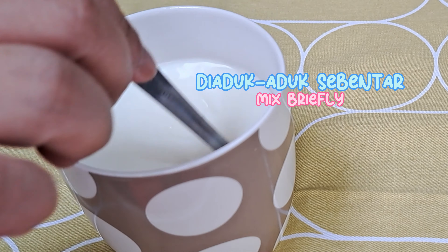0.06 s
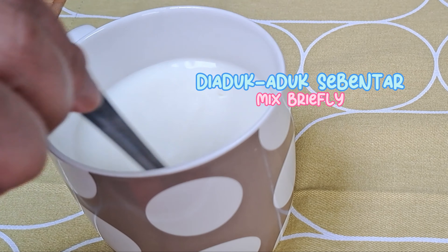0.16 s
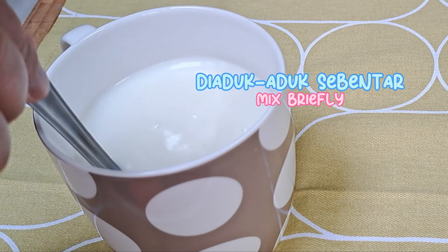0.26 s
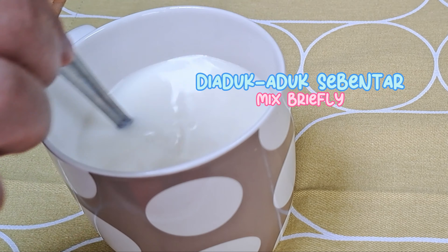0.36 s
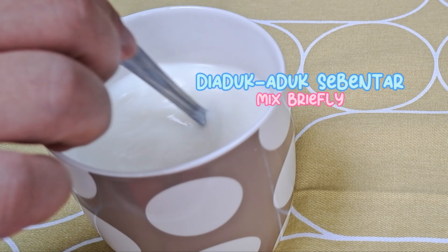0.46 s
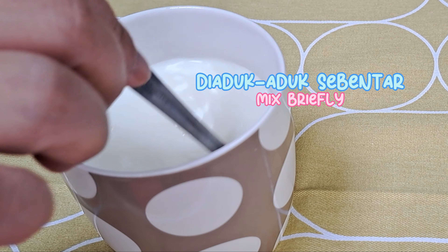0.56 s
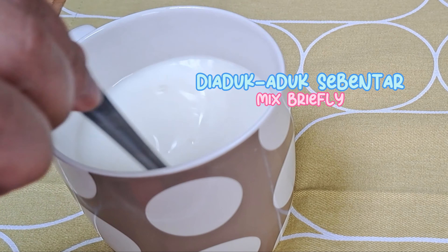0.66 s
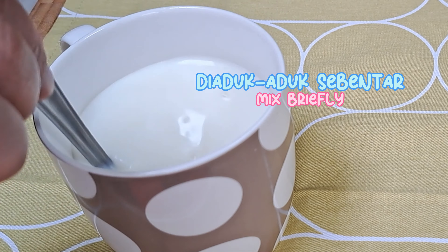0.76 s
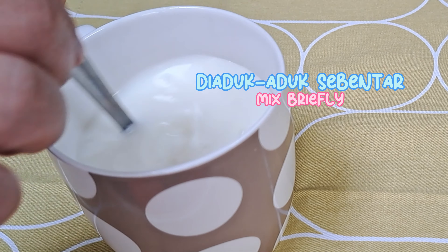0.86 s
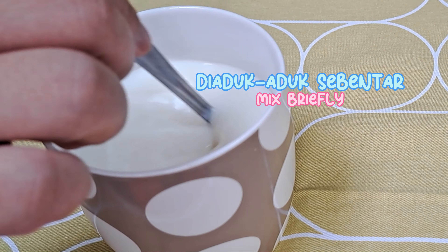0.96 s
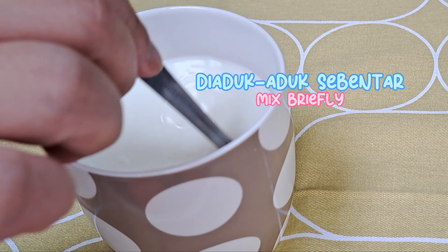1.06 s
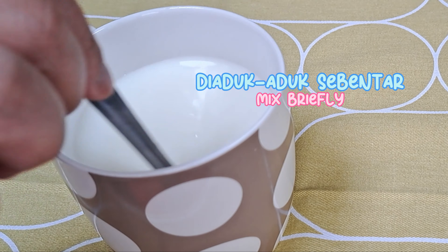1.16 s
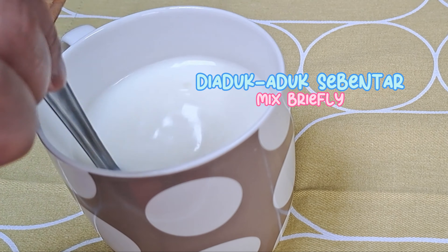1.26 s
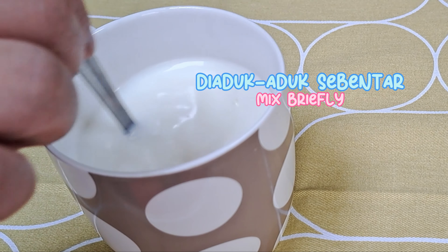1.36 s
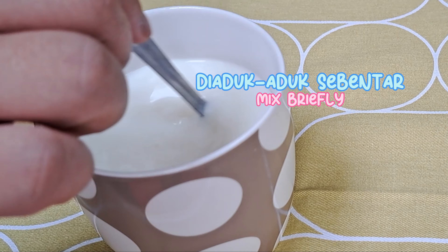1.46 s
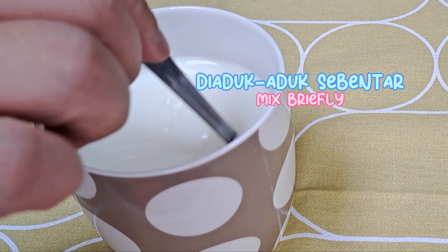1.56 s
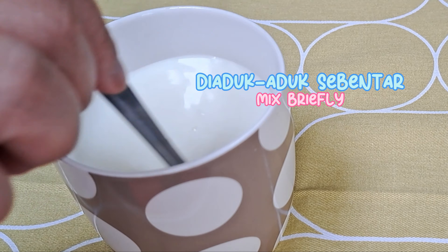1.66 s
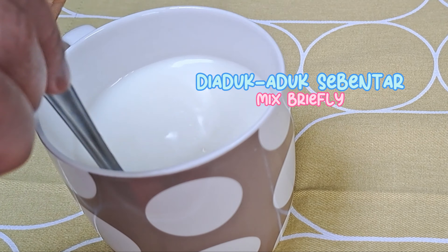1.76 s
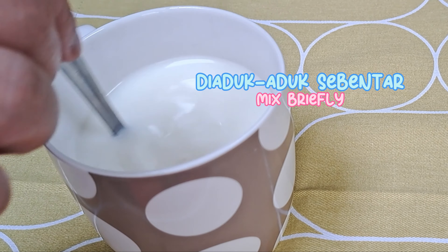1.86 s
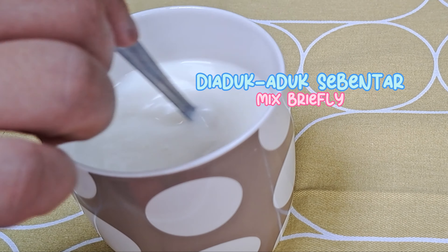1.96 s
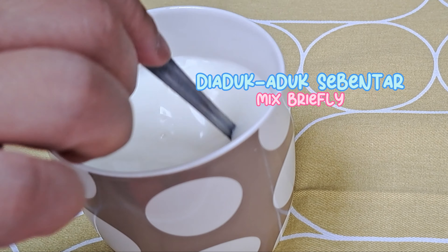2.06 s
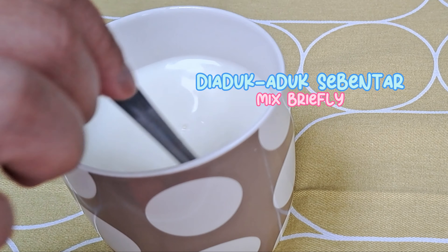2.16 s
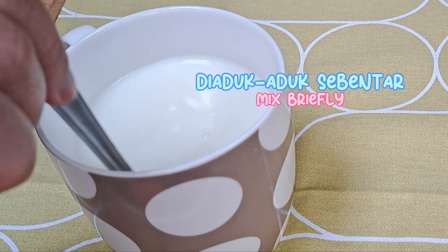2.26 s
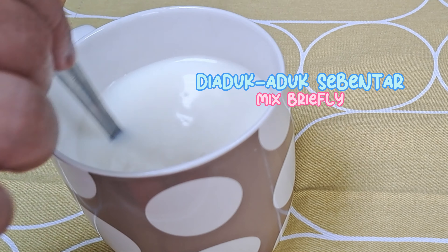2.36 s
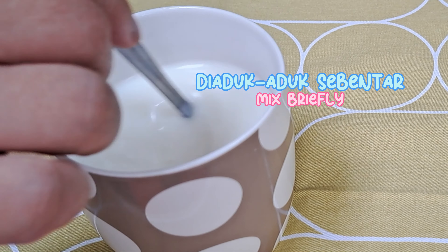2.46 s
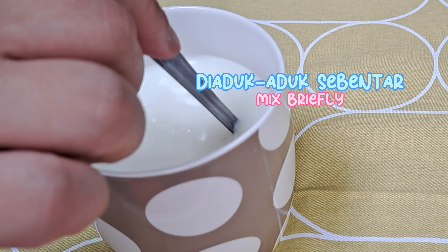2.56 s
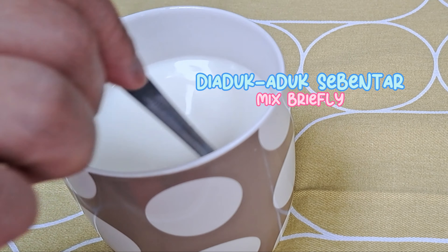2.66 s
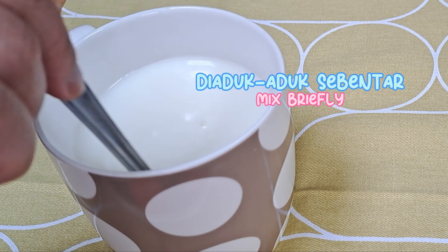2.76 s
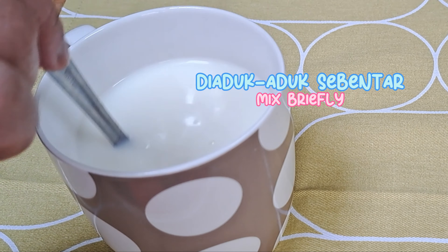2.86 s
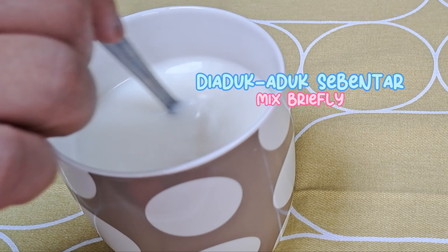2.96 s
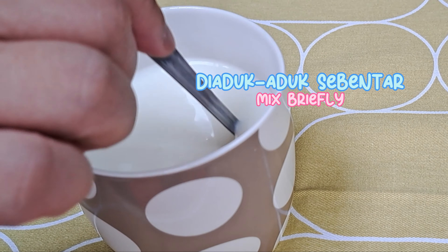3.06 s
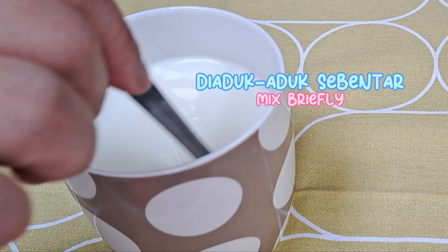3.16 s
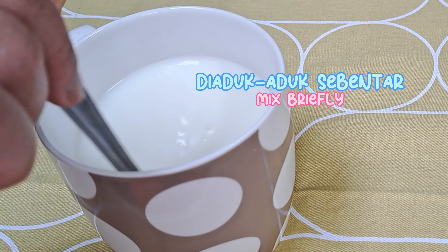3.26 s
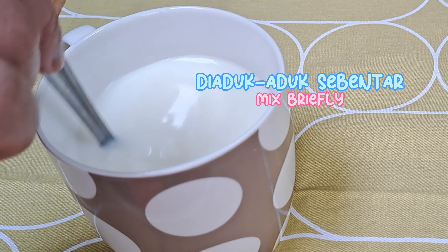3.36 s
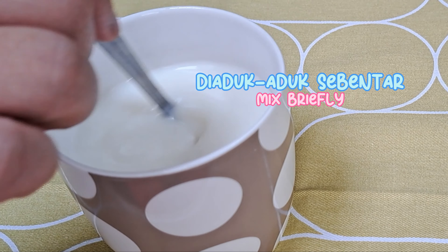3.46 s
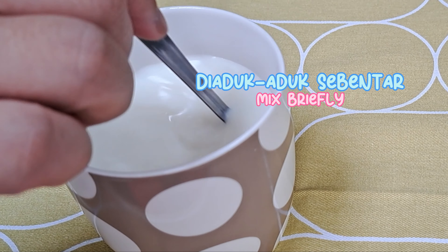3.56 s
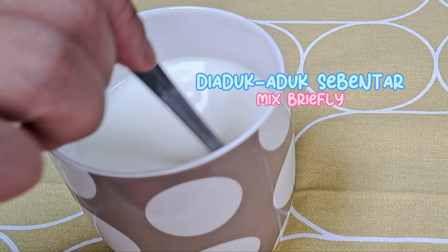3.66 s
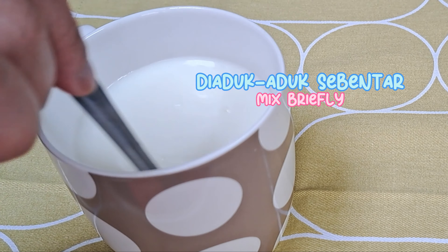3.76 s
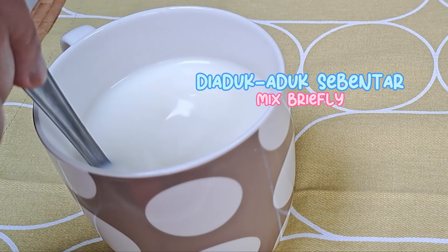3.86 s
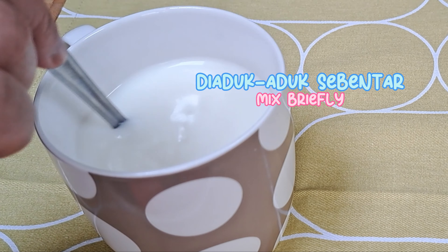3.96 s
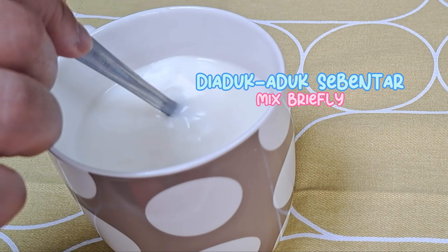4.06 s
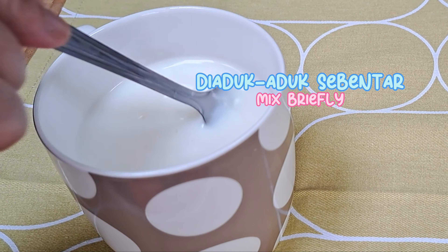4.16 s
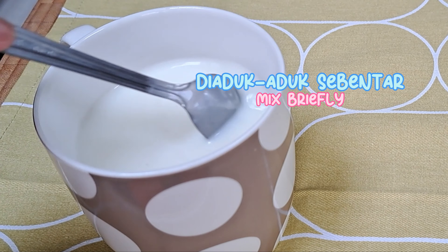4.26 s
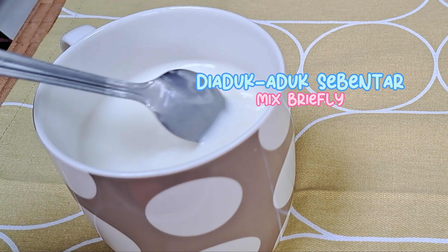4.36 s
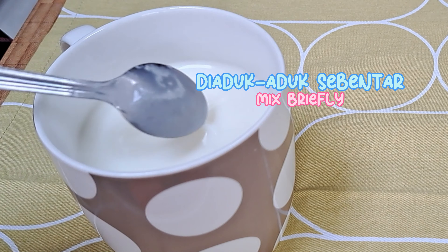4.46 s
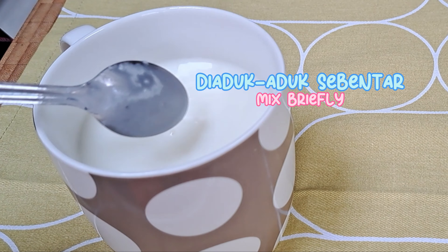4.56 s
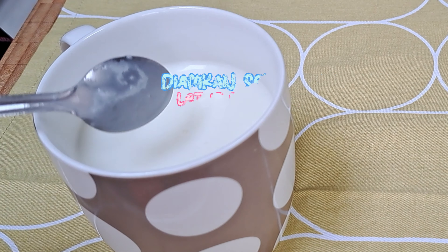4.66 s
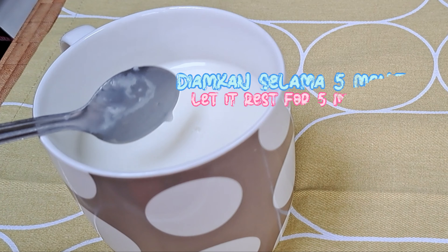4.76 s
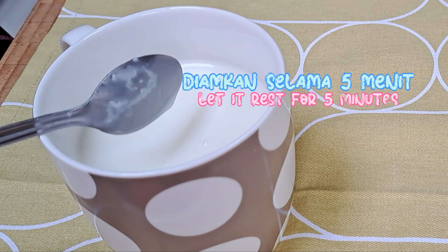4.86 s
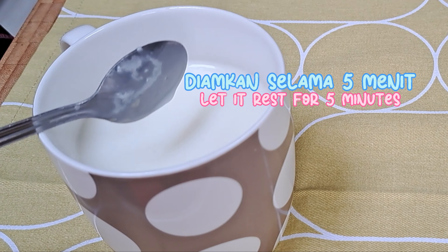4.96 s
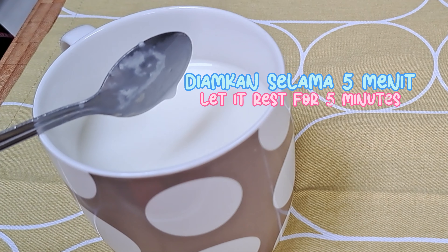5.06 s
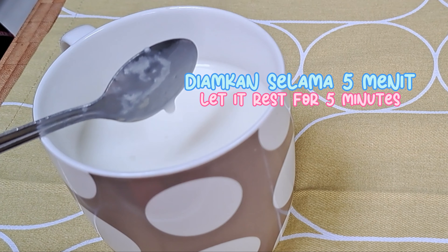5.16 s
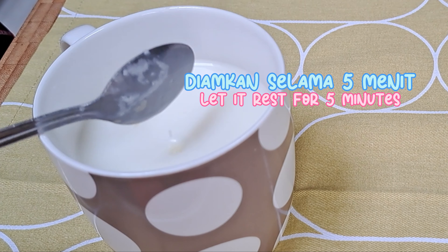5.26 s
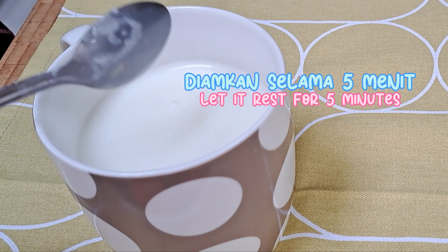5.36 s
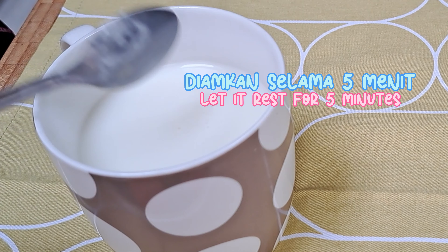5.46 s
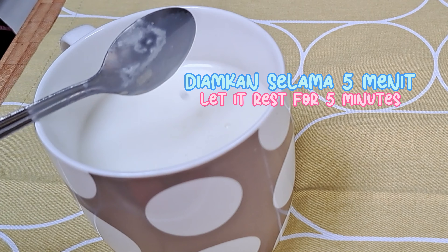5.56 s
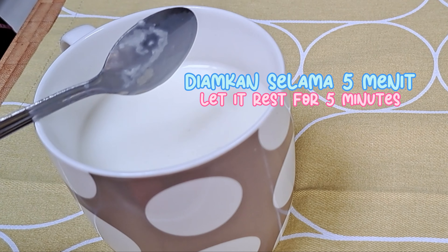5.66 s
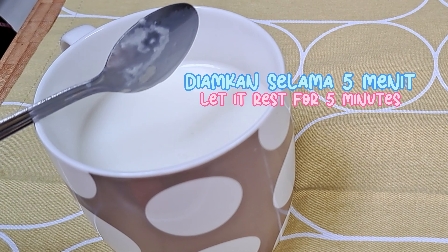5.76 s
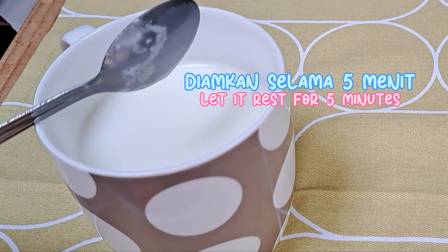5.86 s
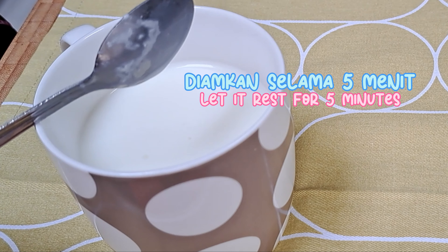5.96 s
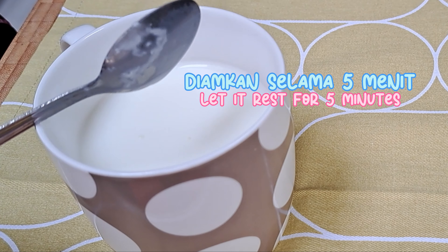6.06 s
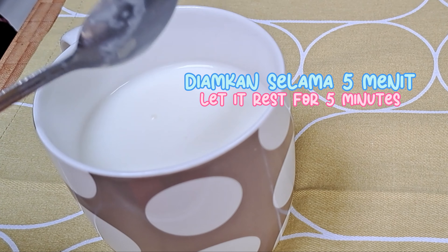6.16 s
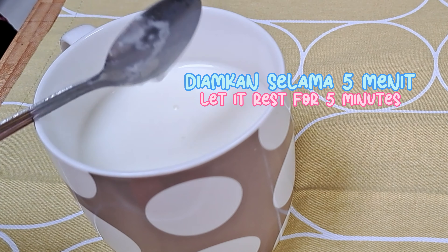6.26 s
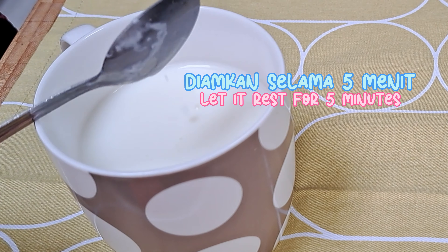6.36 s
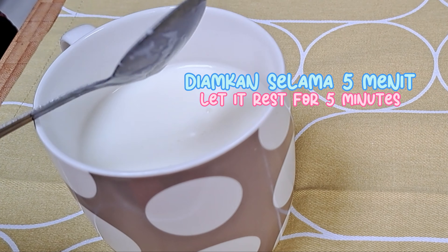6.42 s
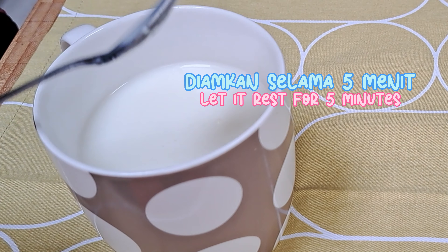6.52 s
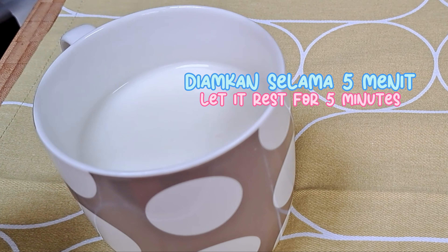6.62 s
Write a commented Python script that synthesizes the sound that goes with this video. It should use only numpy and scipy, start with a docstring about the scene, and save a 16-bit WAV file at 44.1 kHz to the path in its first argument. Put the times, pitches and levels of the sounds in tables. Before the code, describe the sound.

Close-up of a steel teaspoon stirring milk in a ceramic mug: rapid, uneven scrapes, little rasps and bright clinks, about two per turn, with the wall singing softly. After four seconds the spoon lifts out; three spaced taps on the rim follow, ringing and thudding the table. Small live room, faint steady appliance hum.

```python
"""A steel teaspoon stirs milk in a ceramic mug on a cloth-covered table in a small, live room.
For about four seconds it rubs round the wall, rasps and knocks: random slips and short blows drive
resonances of spoon and mug, and the wall sings. Then it is lifted out and tapped three times on the rim
to shed drops, with two light brushes after the first tap; each tap cracks, rings and thuds the table.
An appliance hums throughout, as wavering sines over shaped room noise."""
import sys
import numpy as np
from scipy import signal
from scipy.fft import rfft, irfft
from scipy.io import wavfile
from scipy.ndimage import uniform_filter1d

SR = 44100
rng = np.random.default_rng(int(sys.argv[2]) if len(sys.argv) > 2 else 0)


def digitize_waveform(pressure):
    """Quantize a signal to 16-bit integers and store it at the path in sys.argv[1].

    Rows of a 2-D input are taken as channels; values are limited to [-1, 1].
    """
    field = np.atleast_2d(pressure).T
    bounded = np.clip(field, -1, 1)
    quanta = np.round(bounded * 32767).astype(np.int16)
    wavfile.write(sys.argv[1], SR, quanta)


N = 295029
TIME = np.arange(N) / SR
EARS = np.array([[0.5], [-0.5]])   # left and right take half of a difference each


def from_db(db):
    """Decibels to gain."""
    return 10 ** (np.asarray(db) / 20)


def rms_one(x):
    """Scale to rms 1."""
    return x / np.sqrt(np.mean(x ** 2) + 1e-20)


def unit_energy(x):
    """Scale to energy 1."""
    return x / np.sqrt(np.sum(x ** 2) + 1e-20)


def at_hz(points, hz, axis=1):
    """Read one column of a table on a log-frequency axis."""
    points = np.array(points)
    return np.interp(np.log(np.maximum(hz, 1)), np.log(points[:, 0]), points[:, axis])


def panned(x, pan_db):
    """Place a sound by its level difference, left minus right."""
    return x * from_db(EARS * pan_db)


def add(out, s, sound):
    """Mix a sound in at time s."""
    start = round(s * SR)
    out[:, start:start + sound.shape[-1]] += sound[..., :N - start]


def die_away(t, t60):
    """Exponential decay by 60 dB in t60 seconds."""
    return np.exp(-np.log(1000) * t / t60)


def bandpass(x, hz, width):
    """Keep a band of the given width in Hz round its centre."""
    edges = [hz - width / 2, hz + width / 2]
    return signal.sosfilt(signal.butter(2, edges, "band", fs=SR, output="sos"), x)


def resonate(x, hz, width):
    """A resonance with steep skirts; its centre may glide."""
    turn = np.exp(2j * np.pi * np.cumsum(np.broadcast_to(hz, x.shape[-1:])) / SR)
    y = x / turn + 1e-18   # shift the centre down to 0 Hz, smooth there, shift back
    for smoothing_hz in (2 * width + 600, width):
        keep = np.exp(-np.pi * smoothing_hz / SR)
        y = signal.lfilter([1 - keep], [1, -keep], y)
    return np.real(turn * y)


def drift(rate):
    """Slow random wander of rms 1, with rate new values a second."""
    knots = rng.standard_normal(int(rate * N / SR) + 2)
    return rms_one(np.interp(TIME * rate, np.arange(len(knots)), knots))


# Strokes of the spoon along the wall, about two a turn, and at last two brushes of the rim:
# start_s, length_s, rub_db, rub_swell_db, sing_db (ringing wall), sing_swell_db, grit_db (all relative levels)
STROKES = [(0.0, 0.21, -49, -12, -39, -11, -53), (0.17, .08, -48.5, 1, -28, -7.5, -47.5),
           (0.452, 0.18, -51, 11, -38, 3, -51), (0.668, 0.092, -54.5, -21, -37, -5, -55.5),
           (0.779, .11, -45.5, -12, -44.5, -6, -61), (0.971, 0.25, -49, -6.5, -37, -19, -50.5),
           (1.182, 0.2, -57, 17, -35.5, -11, -50.5), (1.429, 0.2, -51, 9.5, -43.5, 3, -49.5),
           (1.639, 0.16, -59.5, -38, -35.5, -0.5, -54), (2.004, 0.18, -53.5, 10, -40.5, 16, -51.5),
           (2.187, 0.14, -55.5, -3.5, -36, -19, -48), (2.326, 0.12, -45, 3.5, -45.5, -7, -57),
           (2.479, 0.38, -53, -11, -41.5, -1, -49.5), (2.742, 0.11, -51, 4, -39, -2, -51),
           (2.914, 0.099, -53.5, 6, -56, 13, -55), (3.014, 0.219, -48, -13.5, -39, 13, -49.5),
           (3.204, 0.061, -57, -7.5, -24.5, -5, -51), (3.355, 0.16, -49.5, 0, -44, -19, -54),
           (3.509, 0.28, -50, 1, -37, -15, -47.5), (3.751, 0.098, -53, -14, -31, 12, -47.5),
           (3.869, 0.088, -48, -6, -41.5, -2, -54.5), (4.948, .025, -54, -1, -42.5, -4, -60),
           (5.05, 0.012, -59.5, 5, -60, 4, -68)]
# Resonance of the spoon as it is drawn up, before pressing shifts it: time_s, pitch_hz
SPOON_HZ = [(0, 3237), (2.4, 3410), (4, 3400)]


def stirring_controls():
    """Gains of rubbing, singing and grit, and the spoon's resonance; stroke energies add."""
    t, energy = TIME[:SR * 2 // 3], np.zeros((3, N))
    grip = 1 - np.exp(-t / 0.0047)    # the spoon takes hold of the wall
    swing = 1 - np.exp(-t / 0.0077)   # the wall follows more slowly
    lift_db_per_s, ring_out_db_per_s, edge_fade_db_per_s = 480, 202, 204
    edge_s = 0.097   # each stroke begins on the spoon's edge, then rolls onto its smooth back
    for s, length, rub_db, rub_swell_db, sing_db, sing_swell_db, grit_db in STROKES:
        along = np.minimum(t / length, 1) - 0.5
        after = np.maximum(t - length, 0)
        contact = grip * from_db(-lift_db_per_s * after)
        rub = contact * from_db(rub_db + rub_swell_db * along)
        ring_out_db = ring_out_db_per_s * after / ring_stretch(s)
        sing = swing * from_db(sing_db + sing_swell_db * along - ring_out_db)
        grit = contact * from_db(grit_db - edge_fade_db_per_s * np.maximum(t - edge_s, 0))
        add(energy, s, np.square([rub, sing, grit]))
    # pressing harder than the usual -49 dB raises the resonance, by 14.5 Hz per dB
    press_db = np.clip(10 * np.log10(energy[0] + 1e-12) + 49, -10, 10)
    spoon_hz = np.interp(TIME, *np.transpose(SPOON_HZ)) + 14.5 * press_db
    rub, sing, grit = np.sqrt(energy)
    return rub, sing, grit, spoon_hz


def ring_stretch(s):
    """With the spoon out of the milk after 4 s, a touched wall rings 1.82 times longer."""
    return 1.82 if s > 4 else 1


# Mug and spoon, damped by milk and fingers, before each sound shifts or widens them:
# pitch_hz, width_hz, level_db (relative)
WET_MODES = [(1535, 450, 0), (3134, 370, -2.5), (3356, 63, 2.5), (4300, 510, -4), (4846, 63, -1),
             (5623, 72, -3.5), (6480, 190, -7), (7740, 640, -1.5), (9320, 740, -9.5), (11830, 500, -8),
             (12840, 400, -8.5), (15000, 770, -28)]


def rubbing(slips_per_s, grain_db, spoon_db, hollow_db, grit_db, wall_db):
    """Tiny uneven slips of steel on glaze drive the spoon, the wall and the hollow above the milk."""
    rub, sing, grit, spoon_hz = stirring_controls()
    glide = spoon_hz / spoon_hz.mean()
    sizes = from_db(grain_db * np.minimum(rng.exponential(1, (3, N)), 3)) * rng.standard_normal((3, N))
    slips = sizes * (rng.random((3, N)) < slips_per_s / SR) * from_db(2 * drift(70))
    slips = slips[0] + 0.7 * slips[1:]   # partly alike at the two ears

    spoon_tone = resonate(resonate(slips, spoon_hz, width=300), spoon_hz, width=300)
    spoon = from_db(spoon_db) * rub * rms_one(spoon_tone)
    hollow_tone = resonate(slips, 1420 * glide, width=217)
    hollow = from_db(hollow_db) * np.hypot(rub, 1.54 * grit) * rms_one(hollow_tone)
    wall_tone = resonate(slips, 2073, width=102)
    wall = from_db(wall_db) * np.sqrt(sing * rub) * rms_one(wall_tone)
    # the spoon's edge bites and wakes the high modes, tilted down by 0.78 dB per octave
    high_modes = 0
    for hz, width, db in WET_MODES[3:]:
        mode = rms_one(resonate(slips, hz * glide, 2.3 * width))
        high_modes = high_modes + from_db(db - 0.78 * np.log2(hz / 5200)) * mode
    edge = from_db(grit_db) * grit * rms_one(high_modes)
    return panned(spoon + hollow, pan_db=4.5) + wall + edge


# On the near side of the mug the edge digs in and rasps: start_s, length_s, level_db (relative)
RASPS = [(0.215, 0.058, -48.5), (0.663, 0.11, -51.5), (0.771, 0.067, -50.5), (2.19, 0.15, -52.5),
         (2.694, 0.096, -55), (2.793, 0.054, -40.5), (3.801, 0.099, -49), (3.925, 0.057, -55)]


def rasping(slips_per_s, grain_db, hz, width, pan_db):
    """Coarse slips swell and fade, and ring briefly in the spoon's bowl."""
    pressure = np.zeros((1, N))
    for s, length, db in RASPS:
        swell = np.sin(np.pi * np.minimum(TIME[:SR // 4] / length, 1))
        add(pressure, s, from_db(db) * swell)
    sizes = from_db(grain_db * np.minimum(rng.exponential(1, N), 4)) * rng.standard_normal((3, N))
    slips = sizes * (rng.random(N) < slips_per_s / SR)
    bowl = bandpass(slips[0] + slips[1:], hz, width)
    return panned(pressure * rms_one(bowl), pan_db)


def clink(modes, contact_s, crack_db, apart):
    """Steel chatters on glaze for some milliseconds and sets short modes (Hz, width, dB, pan dB) going."""
    t = TIME[:SR // 20]
    noise = rng.standard_normal(len(t)) + apart * rng.standard_normal((2, len(t)))
    chatter = rfft(noise * np.exp(-t / contact_s))
    # a hard contact drives all frequencies alike
    force = irfft(chatter / np.abs(chatter), len(t)) * np.exp(-t / (2 * contact_s))
    sound = from_db(crack_db) * unit_energy(np.diff(force, prepend=0) + force)
    for hz, width, db, pan_db in modes:
        mode = np.array([unit_energy(ear) for ear in resonate(force, hz, width)]) / np.sqrt(2)
        sound = sound + panned(from_db(db) * mode, pan_db)
    return sound


# Knocks on the inner wall, which also feed its ring:
# start_s, clink_db, brightness_db, wall_ring_db, pan_db (levels relative; pan is left minus right)
KNOCKS = [(0.177, -37.5, 4.5, -42, 4), (0.3413, -32.5, -2, -49, 2.5), (0.4009, -34.5, -5, -49, 2),
          (0.792, -45.5, -10, -51, 2), (0.9469, -36.5, 1, -40, 5), (0.9792, -26.5, 5.5, -32.5, 4),
          (1.1609, -28.5, 4, -34, 3), (1.5156, -46, -1, -57, 12), (1.6464, -35, 6.5, -45, 2.5),
          (1.8445, -43, 4, -43.5, 2), (1.9682, -33.5, 9, -45, 2), (2.18, -33.5, 6.5, -33.5, 5),
          (2.4652, -30.5, -2, -36, 4), (3.018, -38.5, 2.5, -37.5, 5), (3.2114, -33.5, 12, -28, 4),
          (3.322, -33, 6.5, -50, 2), (3.3535, -32, -1.5, -49, 1.5), (3.4336, -41, -13, -48, 3),
          (3.5027, -29, 3, -31, 3.5), (3.7442, -33.5, 12.5, -29.5, 3.5), (4.0612, -37, 8.5, -41, 4)]
# Corners of the brightness tilt: pitch_hz
COLOUR_HZ = [3500, 5200, 7500]


def knocks(contact_s, click_db, crack_db):
    """The spoon clinks against the wall about twice a turn; its modes shift with depth and grip."""
    clinks = np.zeros((2, N))
    shifts = 1 + 0.022 * rng.standard_normal((len(KNOCKS), len(WET_MODES)))
    for (s, clink_db, bright_db, wall_db, pan_db), shift in zip(KNOCKS, shifts):
        # the highest modes are 3 dB weaker
        colour_db = [-bright_db / 2, bright_db / 2, bright_db / 2 - 3]
        modes = []
        for (hz, width, db), k in zip(WET_MODES, shift):
            modes.append((hz * k, width, db + np.interp(hz, COLOUR_HZ, colour_db), pan_db))
        add(clinks, s, from_db(click_db + clink_db) * clink(modes, contact_s, crack_db, apart=1.32))
    return clinks


# The wall's oval mode, split in two by the handle: pitch_hz, t60_s (in the milk), level_db (relative)
WALL_RING = [(1982, .25, -11), (2062, .4, 0)]


def singing_wall(sing_db, knock_db, rise_s, jostle, spread):
    """Rubbing and knocks feed the same two swings; their energies add, and slips jostle the phase."""
    rub, sing, grit, spoon_hz = stirring_controls()
    touch = np.minimum(rub / from_db(-56), 1)   # a free wall rings clean
    t, out = TIME[:SR], 0
    for hz, t60, db in WALL_RING:
        energy = np.array([(from_db(sing_db) * sing) ** 2])
        for s, clink_db, bright_db, wall_db, pan_db in KNOCKS:
            decay = die_away(t, t60 * ring_stretch(s)) * (1 - np.exp(-t / rise_s))
            add(energy, s, (from_db(wall_db + knock_db) * decay) ** 2)
        phase = 2 * np.pi * np.cumsum(hz + jostle * touch * drift(35)) / SR
        ear_phase = EARS * (spread + 0.5 * drift(3.7))
        level = np.sqrt(2 * energy) * from_db(db + 2 * touch * drift(20))
        out = out + level * np.sin(phase + ear_phase)
    return out


def ring(modes, rise_s, spread):
    """Decaying sines; each mode radiates unevenly, so it reaches the ears out of step."""
    t, total = TIME[:SR], 0
    for hz, t60, db in modes:
        total = total + from_db(db) * np.sin(2 * np.pi * hz * t + EARS * spread) * die_away(t, t60)
    return total * (1 - np.exp(-t / rise_s))


# Taps on the rim: start_s, table_thud_db, crack_db, pan_db (levels relative)
TAPS = [(4.7567, -31, -40, 5), (5.5142, -21.5, -18.5, 4.5), (6.2840, -23.5, -37, 5)]
# Short modes; each tap lands on another spot of the spoon's bowl:
# pitch_hz, width_hz, pan_db (added to the tap's), first_tap_db, second_tap_db, third_tap_db (relative)
RIM_MODES = [(660, 230, -3.5, -38, -31.5, -33), (1300, 890, -1.5, -34, -32, -31),
             (3630, 335, -4.5, -33, -21, -20), (4240, 1050, 18, -34.5, -28, -34.5),
             (4927, 93, -2.5, -19, -20.5, -24.5), (5250, 120, -4, -37, -21.5, -50),
             (5660, 106, 1.5, -44.5, -21, -20.5), (7360, 200, -1, -29.5, -41, -29.5),
             (7770, 1000, -1, -29, -44, -25.5), (8570, 640, -4, -30, -46.5, -42),
             (9600, 110, -4.5, -26, -26, -56), (10870, 470, -4.5, -36, -38, -26),
             (12050, 1000, -2, -31.5, -36, -29), (12720, 687, -5, -29, -40.5, -31),
             (15500, 550, 6, -40, -37, -36)]
# Long rings after a tap: pitch_hz, t60_s, first_tap_db, second_tap_db, third_tap_db (relative)
RIM_RING = [(2007, 0.42, -31, -23, -35.5), (2082, 0.4, -25.5, -29, -35.5), (4880, 0.19, -19, -54, -23),
            (5570, 0.64, -53, -50, -46), (3706, .26, -48, -40, -28.5)]
# The table under the mug, before a 48 Hz low cut: pitch_hz, t60_s, level_db (relative)
TABLE = [(55, 0.25, -18), (76.4, 0.2, -10), (124.4, 0.17, -10), (151, 0.055, 2.5), (213.5, 0.08, 3.5)]


def taps(contact_s, click_db, thud_delay_s):
    """Hard, short blows on the rim; returns the clinks, the ring and the table's thud."""
    clinks, rings, thuds = np.zeros((3, 2, N))
    low_cut = signal.butter(4, 48, "high", fs=SR, output="sos")
    table = signal.sosfilt(low_cut, ring(TABLE, rise_s=0.008, spread=0.14))
    for k, (s, thud_db, crack_db, pan_db) in enumerate(TAPS):
        short_modes = [(hz, width, db[k], pan_db + lean_db) for hz, width, lean_db, *db in RIM_MODES]
        long_modes = [(hz, t60, db[k]) for hz, t60, *db in RIM_RING]
        add(clinks, s, from_db(click_db) * clink(short_modes, contact_s, crack_db, apart=2.0))
        add(rings, s, panned(ring(long_modes, rise_s=0.0097, spread=1.5), pan_db=4.0))
        add(thuds, s + thud_delay_s, from_db(thud_db) * table)
    return clinks, rings, thuds


def table_rumble(level_db, hz, width):
    """The stirred mug shudders faintly on the table: band noise that follows the smoothed rubbing."""
    rub = stirring_controls()[0]
    effort = np.sqrt(np.abs(uniform_filter1d(rub, size=9000)) / rub.max())
    shudder = bandpass(rng.standard_normal(N), hz, width)
    return from_db(level_db) * effort * rms_one(shudder)


# Lines of the motor: pitch_hz, level_db (relative)
HUM = [(52, -68.5), (140, -67), (200, -59.5), (248, -68.5), (351, -62), (400, -78.5), (585, -62.5),
       (660, -69.5), (703, -60.5)]
# Spectrum of the room noise: pitch_hz, density_db (per Hz, relative)
AIR = [(15, -55), (25, -26), (45, -12.5), (90, -17), (130, -9.5), (195, -8.5), (270, -9.5), (344, -12),
       (463, -11.5), (714, -10.5), (1190, -15.5), (1890, -20), (3430, -33), (6000, -35.5), (7500, -30),
       (10000, -40), (13000, -31.5), (16000, -41)]
# Room noise at the two ears: pitch_hz, likeness (0-1), pan_db (left minus right; doubled for the hum)
AIR_STEREO = [(60, 0.56, 0.5), (140, 0.83, 1), (324, 0.88, -9), (596, 0.04, 0), (1500, 0, 3),
              (8000, 0, 1.5)]


def background(air_db, hum_db, waver_db):
    """Soft shaped room noise and the motor's lines, which waver in level and phase."""
    hz = np.fft.rfftfreq(N, 1 / SR)
    mid, side = rfft(rng.standard_normal((2, N)))
    alike = np.clip(at_hz(AIR_STEREO, hz), 0, 1)
    air = np.sqrt(1 + alike) * mid + np.sqrt(1 - alike) * side * 2 * EARS
    air = air * from_db(at_hz(AIR, hz) + EARS * at_hz(AIR_STEREO, hz, axis=2))
    hum = 0
    for f, db in HUM:
        level = from_db(db + waver_db * drift(9)) * np.sqrt(2)
        line = level * np.sin(2 * np.pi * f * TIME + 1.2 * drift(12))
        hum = hum + panned(line, 2 * at_hz(AIR_STEREO, f, axis=2))
    return from_db(air_db) * rms_one(irfft(air, N)) + from_db(hum_db) * hum


# Reverberation time of the room: pitch_hz, t60_s
ROOM_T60 = [(100, .42), (500, .38), (2000, .38), (5000, .4), (9000, .31), (15000, .25)]


def room_response(gap_s, build_s, hold_s):
    """Dense reflections, different at each ear, that build up, hold a moment and die sooner in the treble."""
    t = TIME[:SR * 2 // 3]
    white, hz = rfft(rng.standard_normal((2, len(t)))), np.fft.rfftfreq(len(t), 1 / SR)
    centres = np.log([f for f, t60 in ROOM_T60])
    tail = 0
    for share, (f, t60) in zip(np.eye(len(centres)), ROOM_T60):
        band = irfft(white * np.interp(np.log(hz + 1), centres, share), len(t))
        tail = tail + band * die_away(np.hypot(t, hold_s) - hold_s, t60)
    return np.sqrt(2) * unit_energy(tail * np.clip((t - gap_s) / build_s, 0, 1))


def in_room(x, room, wet_db):
    """Direct sound plus the reflections."""
    return x + from_db(wet_db) * signal.fftconvolve(x, room, axes=1)[:, :N]


def scene():
    """Spoon, mug and table in the room, over the hum."""
    room = room_response(gap_s=0.003, build_s=0.004, hold_s=0.02)
    scrape = rubbing(slips_per_s=7000, grain_db=2.0, spoon_db=0.5, hollow_db=-2.0, grit_db=-2, wall_db=-3)
    rasp = rasping(slips_per_s=2500, grain_db=3.5, hz=5090, width=1140, pan_db=4.5)
    knock = knocks(contact_s=0.003, click_db=24, crack_db=-36)
    sing = singing_wall(sing_db=-4.0, knock_db=-0.5, rise_s=0.00012, jostle=11.65, spread=0.6)
    tap, tap_ring, thud = taps(contact_s=0.0029, click_db=26, thud_delay_s=0.0036)

    stirring = in_room(scrape + rasp, room, wet_db=-5.5) + in_room(knock, room, wet_db=-5.0)
    tapping = in_room(tap, room, wet_db=-4.0) + in_room(thud, room, wet_db=-5.0)
    wall = in_room(sing + tap_ring, room, wet_db=-13)
    rumble = table_rumble(level_db=-59.5, hz=144.0, width=34)
    return stirring + tapping + wall + rumble + background(air_db=-51.08, hum_db=-1.0, waver_db=1.5)


def record(dry):
    """The highest peaks are rounded, and the top is cut: 60 dB down from 16.6 kHz."""
    rounded = 1.3 * np.tanh(dry / 1.3)
    return signal.sosfilt(signal.cheby2(16, 60, 16600, fs=SR, output="sos"), rounded)


dry = scene()
out = record(dry)
digitize_waveform(out)
```